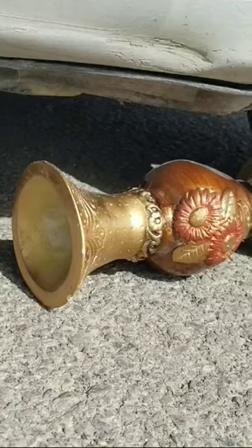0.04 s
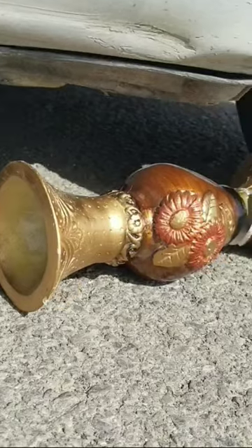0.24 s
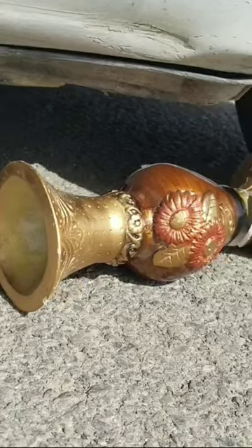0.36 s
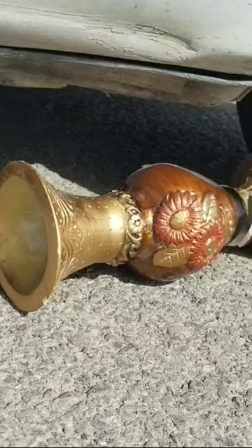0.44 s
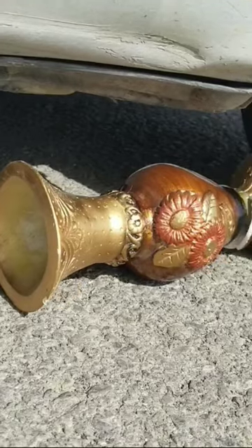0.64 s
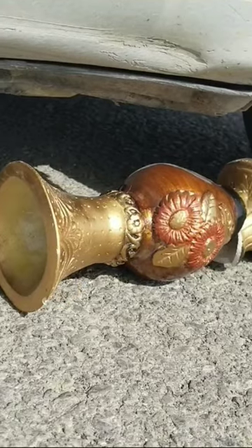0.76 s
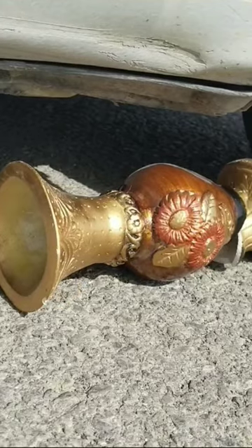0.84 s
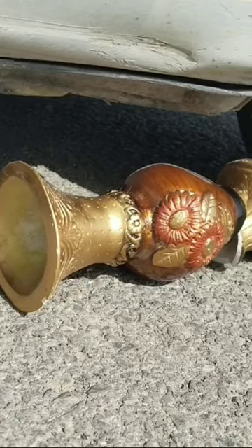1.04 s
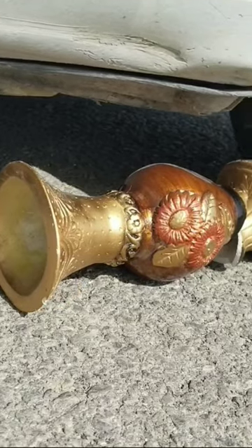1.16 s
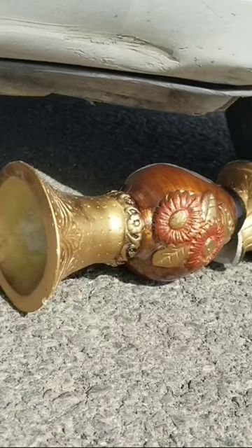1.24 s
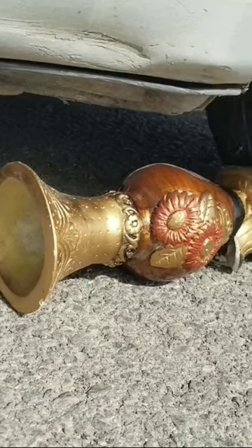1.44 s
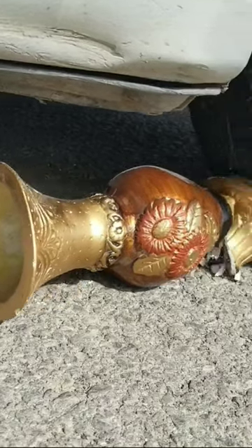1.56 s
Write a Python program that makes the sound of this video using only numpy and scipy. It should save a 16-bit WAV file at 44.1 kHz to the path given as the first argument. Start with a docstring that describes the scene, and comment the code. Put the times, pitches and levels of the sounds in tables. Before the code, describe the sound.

A ceramic vase cracks with a brief clink under a car tyre. Before it, the engine rumbles low and the tyre bumps softly; afterwards splinters tick and the engine eases. Outdoors on pavement, close and mostly on the right.

```python
"""A ceramic vase lying on the pavement cracks as a car creeps onto its foot, engine running low. The car
rumbles, hums, whines and hisses; its tyre bumps softly as it climbs. The wall breaks in a quick run of snaps,
the freed shard rings, and splinters tick just after, all reflected between underside and ground. The background
drops as the vase gives way. The right microphone hears the scene much louder."""
import sys
import numpy as np
from scipy import signal
from scipy.fft import rfft, irfft
from scipy.io import wavfile
from scipy.ndimage import uniform_filter1d

SR = 44100
rng = np.random.default_rng(int(sys.argv[2]) if len(sys.argv) > 2 else 0)


def master_out(mix):
    """Clip the mix to full scale and print it as 16-bit PCM to the path in sys.argv[1]."""
    frames = np.transpose(np.atleast_2d(mix))
    ceiling = np.clip(frames, -1, 1)
    pcm = np.round(ceiling * 32767).astype(np.int16)
    wavfile.write(sys.argv[1], SR, pcm)


N = 70560
T = np.arange(N) / SR
LEFT_LEAD_S = 0.000449
CRACK_S, SHARD_FREE_S = 1.2085, 1.2225


def amp(db):
    """Decibels to gain."""
    return 10 ** (np.asarray(db) / 20)


def unit(x):
    """Scale to rms 1."""
    return x / np.sqrt(np.mean(x ** 2) + 1e-20)


def at_hz(points, hz):
    """Spectrum table interpolated in log frequency."""
    knots_hz, values = np.transpose(points)
    return np.interp(np.log(hz + 1), np.log(knots_hz + 1), values)


def curve(points, column=1):
    """Time table column interpolated at every sample."""
    columns = np.transpose(points)
    return np.interp(T, columns[0], columns[column])


def drift(rate_hz):
    """Random wander, rms 1."""
    hz = np.fft.rfftfreq(N, 1 / SR)
    return unit(irfft(rfft(rng.standard_normal(N)) * np.exp(-(hz / rate_hz) ** 2), N))


def colour(points, size=4096):
    """Minimum-phase impulse response of a spectrum table."""
    log_gain = np.log(amp(at_hz(points, abs(np.fft.fftfreq(size, 1 / SR)))))
    return np.fft.ifft(np.exp(np.conj(signal.hilbert(log_gain)))).real[:size // 2]


def through(x, response):
    """Convolution cut to N samples."""
    return signal.fftconvolve(x, response)[:N]


def strike(start_s, rise_s, t60_s):
    """Envelope: linear rise, exponential decay."""
    age_s = np.maximum(T - start_s, 0)
    return np.minimum(age_s / rise_s, 1) * 1e-3 ** (age_s / t60_s)


# Car noise spectrum (frequency [Hz], relative density [dB])
CAR_SPECTRUM = [(15, -48), (28, -16), (46, -9.5), (80, -1), (125, -2.5), (210, -3.5), (360, -13),
                (430, -12.5), (560, -14.5), (710, -13), (860, -16), (1500, -20), (2200, -22), (3100, -26),
                (4500, -22.5), (5300, -24.5), (6800, -31.5), (8300, -42), (10000, -37.5), (13000, -38.5),
                (15000, -53.5)]
# Car noise balance (frequency [Hz], left minus right [dB])
CAR_BALANCE = [(60, -17), (110, -24), (200, -16), (380, -13.5), (700, -12.0), (1290, -14.5), (2380, -11.5),
               (4400, -15.5), (8120, -7), (15000, -1.5)]
# Car noise likeness between microphones (frequency [Hz], coherence [0..1])
CAR_COHERENCE = [(40, 0.2), (110, 0.34), (300, 1), (750, 1), (1300, 0.61), (5000, 0.42), (9000, 0.3)]
# Low rumble (time [s], gain [dB])
RUMBLE_GAIN = [(.1, -3), (.2, -2), (.3, -2), (.45, -2.5), (.53, -3), (.65, -1), (.82, 2), (1.0, 1.5),
               (1.15, -2.5), (1.25, 2), (1.34, -6), (1.42, -3.5), (1.6, -1)]
# Car level, also drives the hum (time [s], gain [dB])
CAR_LEVEL = [(.1, 0.5), (.3, 0.5), (.75, 0.37), (.95, 0), (1.18, 0.5), (1.28, -4), (1.35, -3.5),
             (1.42, -7.5), (1.6, -8.5)]


def car_noise(level_db=-36, ripple_db=1.4, patch_db=1.3, rumble_top_hz=140, throb_db=0.14, swell_db=0.18):
    """Rumble and hiss of the car, slightly uneven, reaching the left microphone first."""
    hz, frames = np.fft.rfftfreq(2048, 1 / SR), N // 512 + 3
    a, b, c, d, patches = rng.standard_normal((frames, len(hz), 5)).T
    right, independent = a + 1j * b, c + 1j * d
    patches = uniform_filter1d(patches, size=14, axis=0)
    patches = unit(uniform_filter1d(patches, size=4, axis=1))
    # standing resonances under the car
    ripple = unit(uniform_filter1d(rng.standard_normal(len(hz)), size=3)) * np.minimum(hz / 1000, 1)
    coherence = at_hz(CAR_COHERENCE, hz)[:, None]
    lead_s = LEFT_LEAD_S * (1 - np.exp(-(hz / 500) ** 2))
    left_path = np.exp(2j * np.pi * hz * lead_s) * amp(at_hz(CAR_BALANCE, hz))
    left = (coherence * right + np.sqrt(1 - coherence ** 2) * independent) * left_path[:, None]
    shape_db = at_hz(CAR_SPECTRUM, hz)[:, None] + patch_db * patches + ripple_db * ripple[:, None]
    rumble_db = np.interp(np.linspace(0, T[-1], frames), T, curve(RUMBLE_GAIN))
    shelf_db = rumble_db / (1 + (hz[:, None] / rumble_top_hz) ** 2)
    spectra = np.array([left, right]) * amp(shape_db + shelf_db)
    noise = signal.istft(spectra, nperseg=2048, noverlap=1536)[1][:, :N]
    throb = amp(throb_db * drift(45) - swell_db * drift(5.2))
    return noise / noise[1].std() * throb * amp(level_db + curve(CAR_LEVEL))


# Engine orders (multiple of firing rate [1], level under load [dB], slope against car level [dB/dB])
ENGINE_ORDERS = [(1, -46, 2.0), (2, -45, .55), (3, -48, 1.6), (4, -55, .8), (5, -59, .3), (8, -59, 1.2)]


def engine_hum(firing_hz=54.18, waver=0.0076, flutter_db=2.5, left_db=-4):
    """Low harmonics of the firing rate, following the car level."""
    turns = np.cumsum(firing_hz * (1 + waver * drift(6))) / SR
    hum = np.zeros(N)
    for order, db, slope in ENGINE_ORDERS:
        level = amp(db + slope * curve(CAR_LEVEL) + flutter_db * drift(24.5))
        hum += level * np.sin(2 * np.pi * (order * turns + rng.random()))
    return np.sqrt(2) * hum * amp([[left_db], [0]])


# Engine bay tone (time [s], frequency [Hz], level [dB])
WHINE_TRACK = [(.1, 727.4, -44.5), (.3, 730.5, -46.5), (.7, 734.8, -47), (.92, 705, -51), (1.2, 714, -61),
               (1.38, 726, -55.5), (1.6, 780, -56.5)]


def engine_whine(waver=0.0043, flutter_db=3.0, left_db=-12):
    """Thin tone that sags under load and rises when the vase gives."""
    pitch_hz = curve(WHINE_TRACK)
    turns = np.cumsum(pitch_hz * (1 + waver * drift(26.5))) / SR
    level = amp(curve(WHINE_TRACK, column=2) + flutter_db * drift(34))
    left = amp(left_db) * np.sin(2 * np.pi * (turns + pitch_hz * LEFT_LEAD_S))
    return np.sqrt(2) * level * np.array([left, np.sin(2 * np.pi * turns)])


# Engine bay hiss (time [s], level [dB])
HISS_LEVEL = [(.1, -49), (.35, -56.5), (.6, -54), (.95, -58), (1.16, -51.5), (1.24, -53), (1.6, -74)]


def air_hiss(centre_hz=4795, half_width_hz=116, left_db=-15):
    """Air hissing in one narrow resonance."""
    hz = np.fft.rfftfreq(N, 1 / SR)
    resonance = 1 / (1 + ((hz - centre_hz) / half_width_hz) ** 2)
    band = unit(irfft(rfft(rng.standard_normal(N)) * resonance, N))
    return band * amp(curve(HISS_LEVEL)) * amp([[left_db], [0]])


# Tyre bumps (time [s], level [dB], half-width [s])
TYRE_BUMPS = [(0.588, -38, .02), (0.767, -27, .015), (1.021, -33, 0.013), (1.136, -35, 0.0078)]
# Bump spectrum (frequency [Hz], relative level [dB])
BUMP_SPECTRUM = [(25, -33), (45, -17), (68, -1.5), (110, 1.5), (180, -10), (280, -14.5), (600, -41),
                 (3000, -55)]


def tyre_bumps(left_db=-14):
    """Soft low swells as the tyre climbs."""
    swells = sum(amp(db) * np.exp(-((T - at_s) / width_s) ** 2) for at_s, db, width_s in TYRE_BUMPS)
    noise = unit(through(rng.standard_normal(N), colour(BUMP_SPECTRUM)))
    return swells * noise * amp([[left_db], [0]])


# Snaps of the running crack (time [s], level [dB], T60 [s])
CRACK_SNAPS = [(1.2091, -19.5, 0.043), (1.2132, -28.5, 0.05), (1.2205, -28.5, 0.038), (1.2283, -29, 0.039),
               (1.239, -36, 0.11)]
# Snap spectrum (frequency [Hz], relative level [dB])
SNAP_SPECTRUM = [(100, -11), (400, 2.5), (650, -9.5), (1000, 0), (1400, -11), (3300, -1), (3950, 0),
                 (4400, 3), (5400, -1), (7000, -3.5), (8800, -13.5), (11500, -7), (13400, -7.5),
                 (15000, -25)]


def wall_crack(grain_db=0.5, rise_s=0.0003):
    """Each snap is a fast-decaying burst of tiny fractures."""
    grains = unit(rng.standard_normal(N) * amp(grain_db * drift(1500)))
    response = colour(SNAP_SPECTRUM)
    bursts = sum(amp(db) * strike(at_s, rise_s, t60_s) for at_s, db, t60_s in CRACK_SNAPS)
    return through(grains * bursts, response / np.linalg.norm(response))


# Fragment mode envelope (frequency [Hz], relative level [dB])
FRAGMENT_SPECTRUM = [(4600, -37), (6500, -30), (8600, -44), (11500, -36), (13500, -37.5), (14500, -52)]


def fragments(count=44, crack_db=-1, free_db=-4, rise_s=0.00065, t60_s=0.093, scatter_hz=200):
    """Dense high modes of small fragments, struck as the crack opens and as the shard comes free."""
    out = np.zeros(N)
    modes_hz = np.linspace(FRAGMENT_SPECTRUM[0][0], FRAGMENT_SPECTRUM[-1][0], count)
    for start_s, db in (CRACK_S, crack_db), (SHARD_FREE_S, free_db):
        envelope = amp(db) * strike(start_s, rise_s, t60_s)
        for hz in modes_hz:
            strength, detune, phase = rng.random(3)
            tone = np.sin(2 * np.pi * ((hz + scatter_hz * (detune - .5)) * T + phase))
            out += envelope * strength * amp(at_hz(FRAGMENT_SPECTRUM, hz)) * tone
    return out


# Vase modes (frequency [Hz], relative level pinched [dB], relative level free [dB], free T60 [s])
VASE_MODES = [(1231, -52, -32, .23), (1260, -52, -32, .23), (1504, -27, -21.3, .25),
              (1614, -41, -34.5, .26), (1946, -29, -22.5, .16), (2706, -28, -22.5, .14),
              (2790, -26, -15.5, .135), (3295, -35, -31, .2), (3343, -28, -25, .25), (3543, -17, -24, .12),
              (4292, -30, -29, .13), (4332, -32, -31, .15), (5256, -28, -28, .1), (5636, -33, -31, .11),
              (5698, -34, -33, .11), (7135, -37, -38, .11)]


def shard_ring(gain_db=0.5, chatter=0.086, pinched_rise_s=0.00034, pinched_t60_s=0.13, release_s=0.004):
    """The wall rings briefly while pinched, then longer once the shard is free."""
    out = np.zeros(N)
    free_age_s = T - SHARD_FREE_S
    grip = 1 - np.clip(free_age_s / release_s, 0, 1)
    pinched_envelope = grip * strike(CRACK_S, pinched_rise_s, pinched_t60_s)
    for hz, pinched_db, free_db, t60_s in VASE_MODES:
        pinched = amp(pinched_db) * np.sin(2 * np.pi * (hz * T + rng.random()))
        free = amp(free_db) * np.sin(2 * np.pi * hz * free_age_s + rng.random())
        mode = pinched * pinched_envelope + free * strike(SHARD_FREE_S, release_s, t60_s)
        out += mode * (1 + chatter * drift(120))
    return amp(gain_db) * out


def underside_echo(x, echo_db, gap_s=0.0017, t60_s=0.14):
    """Direct sound plus scattered reflections between the car's underside and the pavement."""
    taps = rng.standard_normal(N) * (rng.random(N) < .1)
    taps *= strike(gap_s, 0.0025, t60_s)
    return x + amp(echo_db) * through(x, taps / np.linalg.norm(taps))


# Splinter ticks (time [s], level [dB])
SPLINTER_TICKS = [(1.3459, -15.5), (1.3489, -17), (1.351, -33), (1.3593, -37), (1.367, -34), (1.3735, -34)]
# Tick spectrum (frequency [Hz], relative level [dB])
TICK_SPECTRUM = [(200, -28), (900, -13.5), (1500, -6.5), (2200, -8.5), (4200, -4), (5500, -7.5),
                 (7500, -35), (12000, -23.5), (15000, -28)]


def splinter_ticks(clink_hz=4287, clink_t60_s=0.0034, clink_db=-18):
    """Splinters give dry clicks that ring for a few cycles."""
    impulses = np.zeros(N)
    for at_s, db in SPLINTER_TICKS:
        impulses[round(at_s * SR)] += amp(db)
    click = colour(TICK_SPECTRUM)
    clink = amp(clink_db) * strike(0, .0001, clink_t60_s) * np.cos(2 * np.pi * clink_hz * T)
    return through(impulses, click / abs(click).max()) + through(impulses, clink)


# Path from vase to left microphone (frequency [Hz], gain [dB])
VASE_LEFT_PATH = [(200, -2.5), (1500, -16.5), (2000, -11), (3000, -21.5), (5500, -26.5), (9500, -9),
                  (14000, -24)]


def scene():
    """Breaking vase over the running car, as (left, right)."""
    breakage = wall_crack() + fragments() + splinter_ticks()
    ring = shard_ring()
    left = through(underside_echo(breakage + ring, echo_db=-7.5), colour(VASE_LEFT_PATH))
    right = underside_echo(breakage, echo_db=-9.5) + underside_echo(ring, echo_db=-19)
    car = car_noise() + engine_hum() + engine_whine() + air_hiss() + tyre_bumps()
    return np.array([left, right]) + car


def record(dry, silence_s=0.082, fade_s=0.021, cutoff_hz=15300):
    """Brief silence, fade-in, low-pass."""
    fade_in = np.clip((T - silence_s) / fade_s, 0, 1)
    lowpass = signal.firwin(255, cutoff_hz, window=("kaiser", 9), fs=SR)
    return signal.oaconvolve(dry * fade_in, lowpass[None], "same")


dry = scene()
out = record(dry)
master_out(out)
```